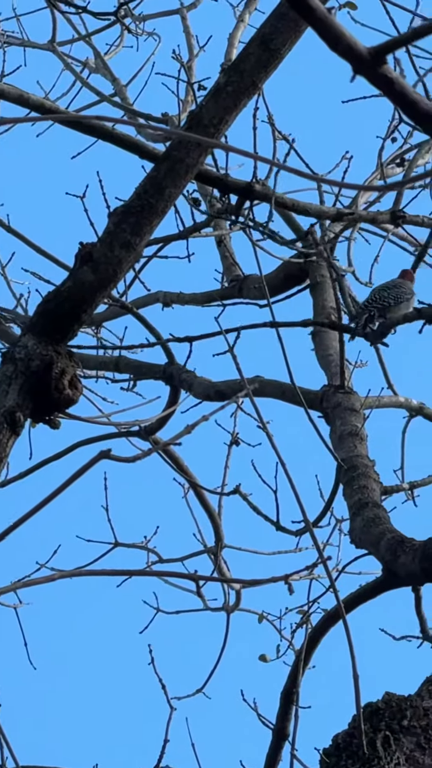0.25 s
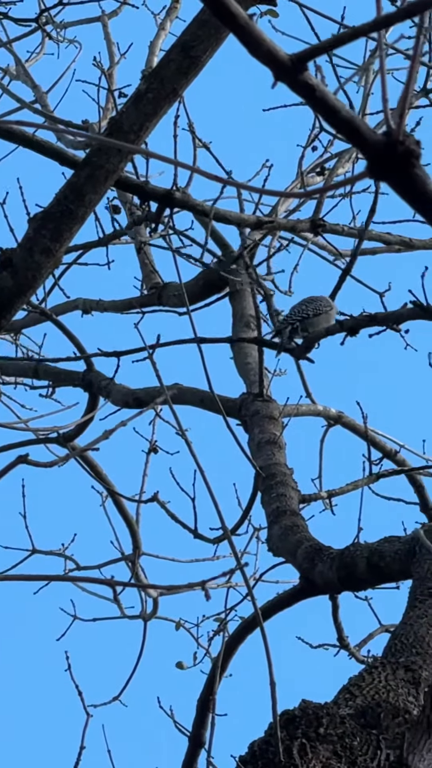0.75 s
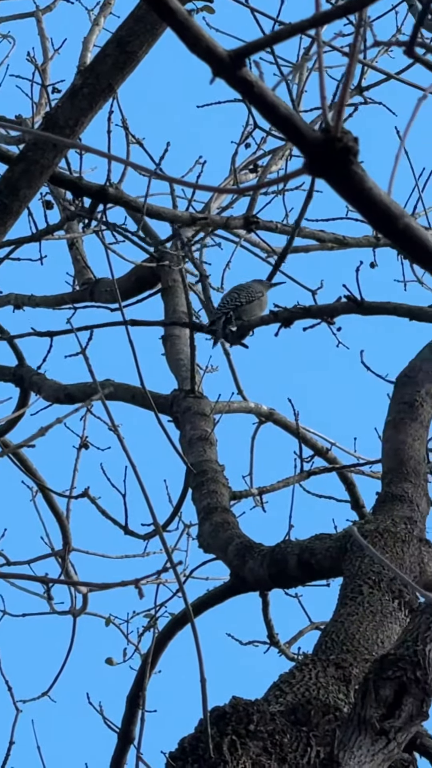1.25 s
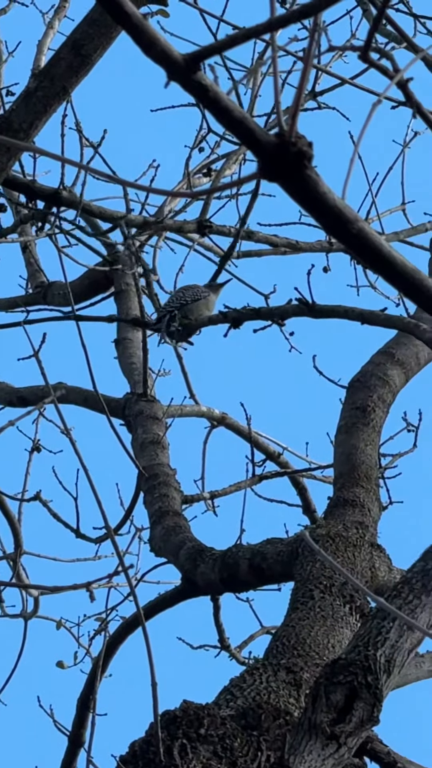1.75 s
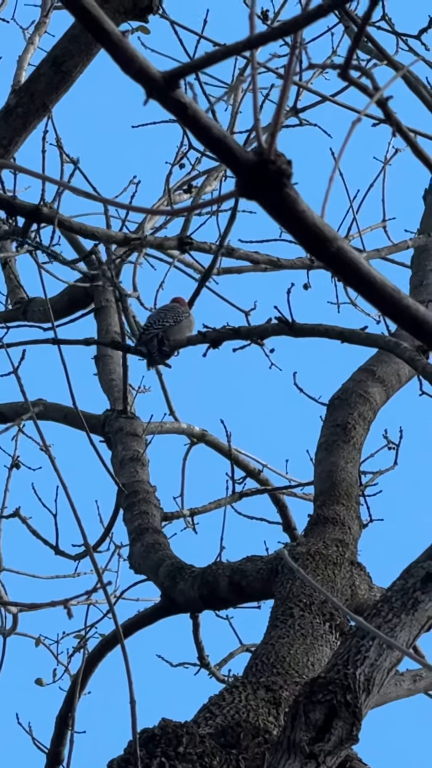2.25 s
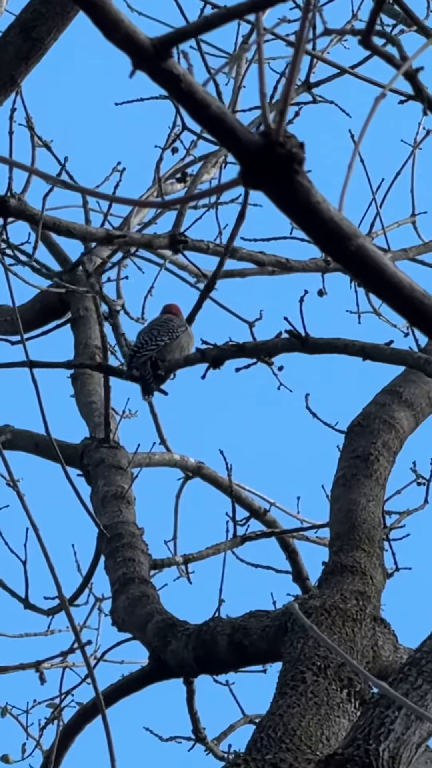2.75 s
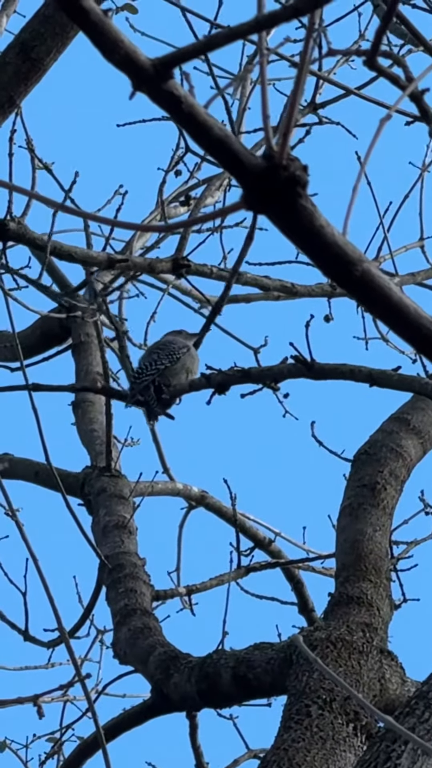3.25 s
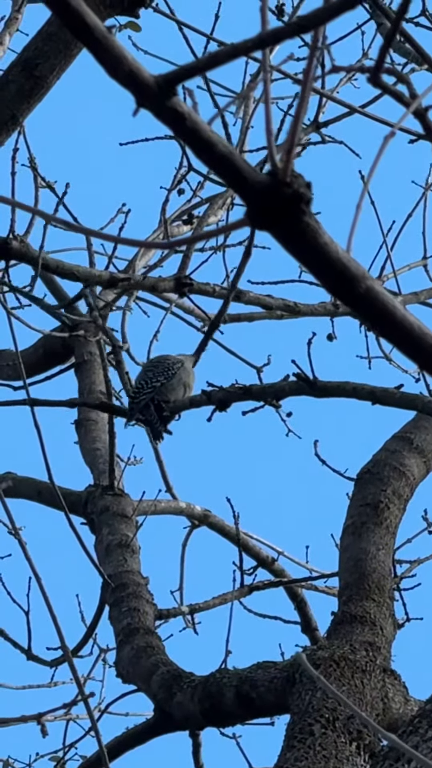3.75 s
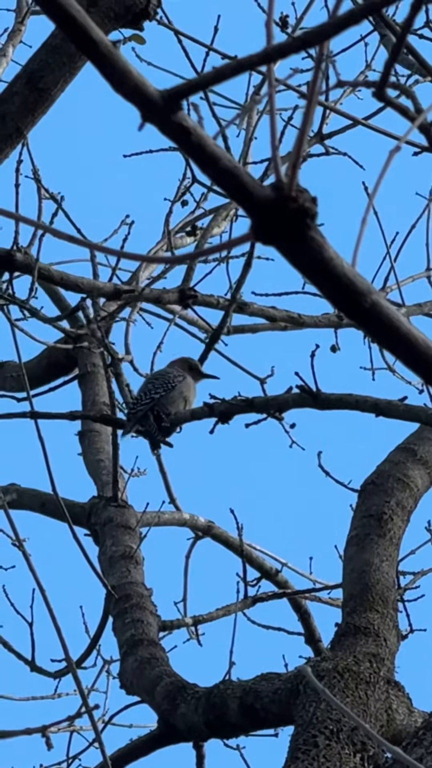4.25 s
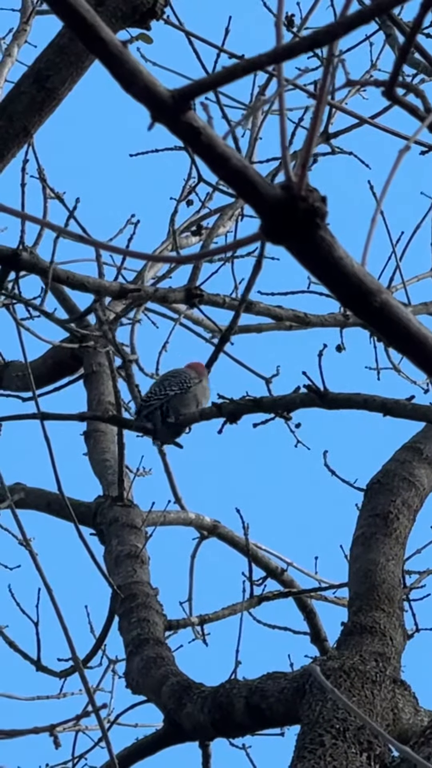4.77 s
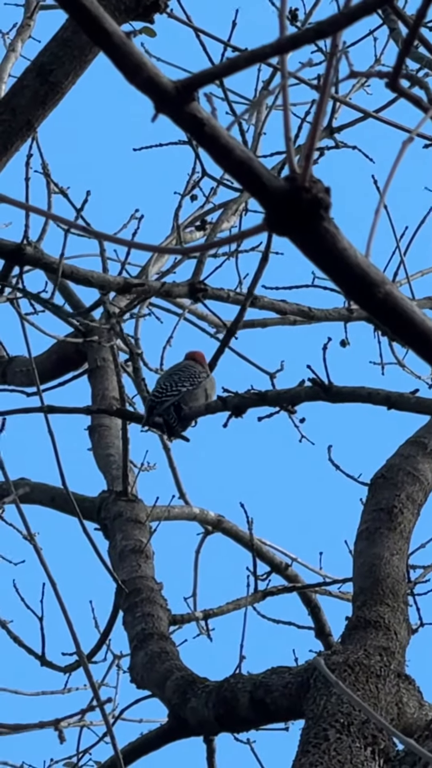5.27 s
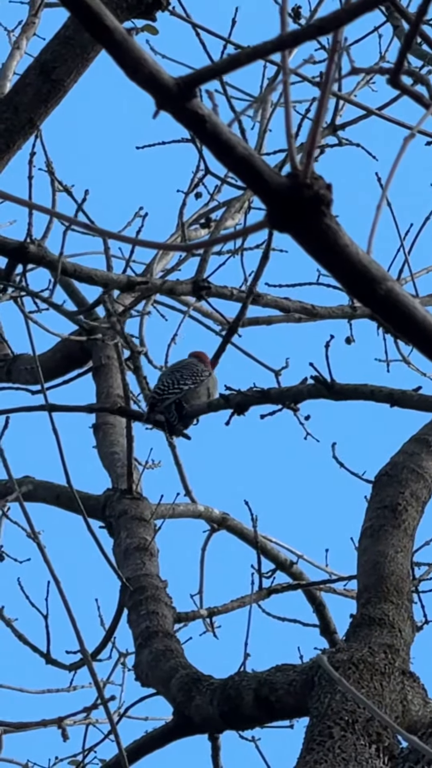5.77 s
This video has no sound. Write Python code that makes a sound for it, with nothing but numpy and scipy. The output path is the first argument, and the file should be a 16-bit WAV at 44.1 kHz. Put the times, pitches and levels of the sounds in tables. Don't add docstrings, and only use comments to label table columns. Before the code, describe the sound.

A woodpecker in bare trees gives short harsh rattling calls with dropping whistles, over lumpy low wind thuds and a faint distant hum.

```python
import sys
import numpy as np
from scipy import signal
from scipy.fft import rfft, irfft, next_fast_len
from scipy.io import wavfile
from scipy.ndimage import uniform_filter1d, map_coordinates

SR = 44100
rng = np.random.default_rng(int(sys.argv[2]) if len(sys.argv) > 2 else 0)


def file_out(sig):
    cols = np.atleast_2d(sig).T
    lim = np.clip(cols, -1, 1)
    pcm = np.round(lim * 32767).astype(np.int16)
    wavfile.write(sys.argv[1], SR, pcm)


def gain_from_db(level_db):
    decades = np.asarray(level_db, float) / 20
    return 10 ** decades


N = 265085

# (peak time [s], peak level [dB], top pitch [Hz], hold [s], pitch crest after the peak [s])
RATTLES = [(.491, -45.5, 583.6, 0.00084, -0.002), (1.917, -39, 639, 0.011, 0.0022),
           (2.212, -44.5, 578.5, .004, .001), (4.479, -41, 655.3, .002, -0.0036),
           (4.775, -46, 622, .009, .004), (5.096, -47.5, 581, 0.0019, .003)]
# (peak time [s], peak level [dB], pitch at the peak [Hz], opening pitch [Hz], drop [s])
WHISTLES = [(.503, -45.5, 1553, 1630, .011), (1.937, -42, 1450, 1600, 0.0077),
            (2.23, -43.5, 1540, 1720, .006), (4.503, -35.5, 1571, 1950, 0.0122),
            (4.788, -53.5, 1600, 1650, 0.0059), (5.103, -51.5, 1500, 1630, .011)]
# (swell [dB per ms], held before the peak [s], tail pitch [Hz], tail level [dB], end time [s])
TAILS = [(3.5, 0.0041, 1190, -53.5, 0.577), (4.5, 0.0028, 1250, -54.5, 2.01),
         (3.5, 0.0026, 1185, -51, 2.33), (1.2, 0.01, 1260, -51.5, 4.582), (1.5, .02, 1180, -51.5, 4.878),
         (3, .003, 1150, -58, 5.235)]
# (breath level [dB], puff over it [dB], puff after the whistle's peak [s])
BREATHS = [(-57.5, 14.5, .004), (-55, 2, -0.034), (-59.5, 11, -.006), (-55, 9.5, 0.013), (-57, 9, -.006),
           (-59, 3, 0.001)]
HISS_HZ = [4470, 5000, 4420, 5360, 4870, 4360]
# (throat frequency [Hz], throat level [dB], gape frequency [Hz], gape level [dB], sheen level [dB])
BEAK = [(2860, -0.5, 4075, 13, 3.5), (3720, 5.5, 5040, 8.5, 11.5), (3160, 5.5, 4520, 15, -10),
        (2950, -1, 5200, 17, 5), (3200, 6.5, 4060, 14, 6), (2630, 4, 4100, 8.5, -19)]
LEAD_IN_S, CALL_S = .025, .195
BEAMED = .3


def woodpecker():
    out = np.zeros((2, N))
    for *rows, hiss_hz, beak in zip(RATTLES, WHISTLES, TAILS, BREATHS, HISS_HZ, BEAK):
        t = rows[0][0] - LEAD_IN_S + np.arange(round(CALL_S * SR)) / SR
        rattle_hz, rattle_db, whistle_hz, whistle_db, breath_db = phrase(t, *rows)
        slack = np.clip((1550 - whistle_hz) / 350, 0, 1)
        turn = 2 * np.pi * np.cumsum(rattle_hz * (1 + .003 * wobble(300, size=len(t)))) / SR
        rattle = rattling_membrane(rattle_hz, turn, beak)
        whistle = whistling_membrane(whistle_hz, slack)
        breath = puffed_breath(turn, hiss_hz, beak)

        call = gain_from_db(rattle_db - 1.5) * rattle
        call += gain_from_db(whistle_db + 5) * whistle
        call += gain_from_db(breath_db + 1.0) * breath
        missed = BEAMED * (1 - slack) * gain_from_db(whistle_db + 5.5) * whistle
        add(out, t[0], call[None])
        add(out, t[0] + 0.0037, gain_from_db(-8.5) * trees(call - missed))
    return out


# (time [s], share of top pitch [0-1])
ARCH = [(-.025, .84), (-.011, .925), (0, 0.99), (.01, .945), (.02, .88)]
SWELL_DB_MS2, CHOKE_DB_MS2, MUTE_DB = .075, .14, 45
ATTACK_S, ATTACK_DB_MS, RELEASE_DB_MS = 0.013, 1.9, 2
GLIDE_S = .026
SNAP_DB_MS, SAG_DB_S, FALTER_DB = 0.9, 110, 2.5
SAG_HZ_S, SAG_S, WANDER = 2300, .06, .03
PUFF_S, BREATH_SAG_DB_S = 0.011, 45.5


def phrase(t, rattle, whistle, tail, breath):
    head_s, head_db, top_hz, hold_s, crest_s = rattle
    peak_s, peak_db, peak_hz, high_hz, drop_s = whistle
    swell_db_ms, held_s, tail_hz, tail_db, end_s = tail
    breath_db, puff_db, puff_s = breath
    ms = lambda seconds: 1000 * np.maximum(seconds, 0)
    release_db = RELEASE_DB_MS * ms(t - end_s)
    edges_db = ATTACK_DB_MS * ms(t[0] + ATTACK_S - t) + release_db

    rattle_hz = top_hz * np.interp(t - head_s - crest_s, *np.transpose(ARCH))
    loss_db = SWELL_DB_MS2 * ms(head_s - t) ** 2 + CHOKE_DB_MS2 * ms(t - head_s - hold_s) ** 2
    rattle_db = head_db - np.minimum(loss_db, MUTE_DB) - release_db

    held = np.exp(-(np.maximum(t - peak_s, 0) / drop_s) ** 1.5)
    sunk_hz = tail_hz - SAG_HZ_S * np.clip(t - peak_s, 0, SAG_S)
    sunk_hz = sunk_hz * (1 + WANDER * wobble(45, size=len(t)))
    glide_hz = (high_hz - peak_hz) * np.clip((peak_s - t) / GLIDE_S, 0, 1) ** 2
    whistle_hz = held * peak_hz + (1 - held) * sunk_hz + glide_hz

    tired_db = tail_db - SAG_DB_S * (t - peak_s) + FALTER_DB * wobble(50, size=len(t))
    after_db = np.maximum(peak_db - SNAP_DB_MS * ms(t - peak_s), np.minimum(peak_db, tired_db))
    whistle_db = after_db - swell_db_ms * ms(peak_s - held_s - t) - 2 * edges_db

    puff = puff_db * np.exp(-((t - peak_s - puff_s) / PUFF_S) ** 2)
    breath_db = breath_db - BREATH_SAG_DB_S * (t - head_s) + puff - edges_db
    return rattle_hz, rattle_db, whistle_hz, whistle_db, breath_db + FALTER_DB * wobble(50, size=len(t))


def rattling_membrane(rattle_hz, turn, beak):
    k = np.arange(1, 27)[:, None]
    smear = np.array([wobble(350, size=len(turn)) for _ in k])
    blur = smear * np.minimum(k / 11, 1.3) ** 3
    opening = rattle_hz / rattle_hz.max()
    spread = .12 * k ** 2
    return np.sum(throat(k * rattle_hz, opening, beak) * np.cos(k * turn + blur + spread), axis=0)


OVERTONES = [-13, 0, -12, -30, -19, -32]


def whistling_membrane(whistle_hz, slack):
    size = len(whistle_hz)
    shake = (.005 + .032 * slack) * wobble(220, size=size)
    swing = 2 * np.pi * np.cumsum(whistle_hz * (1 + shake)) / SR
    whistle = np.zeros(size)
    for n, db in enumerate(OVERTONES, 1):
        slack_db = slack * (5.6 * (n == 1) - 16 * (n > 2))
        dip_db = 10 * bump(n * whistle_hz, 860, 350)
        whistle += gain_from_db(db + slack_db - dip_db) * np.sin(n * swing)
    whistle *= gain_from_db((1.2 + 2 * slack) * wobble(120, size=size))
    glide = uniform_filter1d(np.abs(np.gradient(np.log(whistle_hz))) * SR, size=SR // 300)
    whistle *= gain_from_db(-np.minimum(.018 * glide ** 2, 18))
    flap = 2 * np.pi * np.cumsum(310 * (1 + 0.074 * wobble(90, size=size))) / SR
    return whistle * gain_from_db(6 * slack * np.cos(flap))


# (frequency [Hz], level [dB])
BREATH = [(900, -2.5), (1300, 6.5), (2300, 6), (3200, -0.5), (5000, 3), (12000, 4.5)]


def puffed_breath(turn, hiss_hz, beak):
    puffs = rng.standard_normal(len(turn)) * (1 + 0.81 * np.cos(turn))
    hiss_db = lambda hz: along(BREATH, hz) + 6.4 * bump(hz, hiss_hz, 500)
    return unit(filtered(puffs, lambda hz: throat(hz, 0, beak) * gain_from_db(hiss_db(hz))))


# (frequency [Hz], level [dB])
THROAT = [(600, -29.5), (1200, -9), (1850, -6.5), (2500, -7), (3150, 0.5), (3800, -11), (4400, -15.5),
          (5600, -15.5), (7500, -10.5), (8800, -24.5), (10500, -21.5), (12600, -30), (15000, -30)]


def throat(hz, gape, beak):
    throat_hz, throat_db, gape_hz, gape_db, sheen_db = beak
    db = along(THROAT, hz) + throat_db * bump(hz, throat_hz, 800)
    db = db + gape_db * bump(hz, gape * gape_hz, 500)
    return gain_from_db(db + sheen_db * bump(hz, 12000, 3800))


# (time [s], from [Hz], to [Hz], length [s], level [dB])
NEAR_CHIPS = [
    (2.229, 5740, 8190, .025, -48.5),
    (2.933, 8130, 7130, 0.021, -69.5),
]
# (time [s], from [Hz], to [Hz], length [s], level [dB])
FAR_CHIPS = [
    (.662, 6400, 6930, .04, -91),
    (.71, 7400, 8370, .037, -89.5),
    (.739, 8300, 7180, .084, -88),
    (1.357, 5740, 7870, .038, -73),
    (4.19, 3875, 3490, .25, -98.5),
    (5.004, 5712, 7670, .03, -66),
]
# (time [s], from [Hz], to [Hz], length [s], level [dB])
THIN_CHIPS = [(1.36, 12500, 15300, .035, -95), (5.005, 12300, 15000, .028, -69)]
NEAR_ECHO_DB, FAR_ECHO_DB = -9.5, 12.5


def songbirds():
    out = np.zeros((2, N))
    chips = [(*chip, NEAR_ECHO_DB) for chip in NEAR_CHIPS]
    chips += [(*chip, FAR_ECHO_DB) for chip in FAR_CHIPS + THIN_CHIPS]
    for s, from_hz, to_hz, length, direct_db, echo_db in chips:
        u = np.minimum(np.arange(SR // 3) / (length * SR), 1)
        hz = to_hz + (from_hz - to_hz) * (1 - u) ** 1.6
        note = np.sin(np.pi * u ** 0.98) * np.sin(2 * np.pi * np.cumsum(hz) / SR)
        add(out, s, gain_from_db(direct_db + 3.5) * note[None])
        add(out, s, gain_from_db(direct_db + echo_db + 2.5) * trees(note))
    return out


# (time [s], peak level [dB], time to fall 60 dB [s], rustle under the peak [dB])
TICKS = [(0.8636, -67.5, 0.0018, -13), (0.9223, -65, 0.00138, -16.5), (0.9827, -73.5, 0.0048, -6),
         (1.11, -78, 0.0036, -10.5), (1.172, -77.5, 0.0036, -15), (1.1798, -65, 0.0041, -13.5),
         (1.6204, -72.5, 0.0031, -7.5), (2.5264, -89.5, 0.0039, -10), (3.1065, -72, 0.0062, -13),
         (3.351, -78, 0.004, -10), (3.975, -71.5, 0.0035, -10), (3.989, -75, 0.0043, -6.5),
         (4.011, -73.5, 0.004, -7.5), (4.2194, -82, 0.0047, -10)]
# (frequency [Hz], level [dB])
TWIG = [(1000, -17), (4000, 0.5), (7000, 1.5), (10500, 11.5), (15000, -3.5)]


def twigs():
    out, t = np.zeros((1, N)), np.arange(SR // 10) / SR
    for s, db, t60, rustle_db in TICKS:
        spit = gain_from_db(db + 1 - 60 * t / max(t60, .001))
        rustle = gain_from_db(db + rustle_db - 60 * t / 0.11)
        add(out, s, (spit + rustle) * rng.standard_normal((1, len(t))))
    return filtered(out, lambda hz: gain_from_db(along(TWIG, hz)))


# (frequency [Hz], time to fall 60 dB [s])
TREES = [(1000, 1), (3000, 0.86), (6000, 0.63), (9000, 0.69), (15000, 0.38)]
# (delay [s], level [dB])
ECHOES = [(.018, -20), (.033, -20), (.056, -17), (.071, -20), (.11, -22)]


def trees(x):
    hz, t, z = signal.stft(rng.standard_normal((2, SR)), SR, nperseg=256)
    near_db = 6 / (1 + (t / 0.14) ** 4)
    fall_db = 60 * t / along(TREES, hz)[:, None]
    mid, side = signal.istft(z * gain_from_db(near_db - fall_db), SR, nperseg=256)[1]
    tail = np.array([mid + 0.13 * side, mid - 0.41 * side]) / np.linalg.norm(mid)
    for s, db in ECHOES:
        tail[:, round(s * SR)] += gain_from_db(db + rng.normal(0, 3.5))
    swaying = .64 + .78 * wobble(700, size=len(x))
    return signal.fftconvolve((x * swaying)[None], tail, axes=1)


def background():
    t = np.arange(N) / SR
    push, duck = cross_gusts(t)
    return wind_thuds(t) + push + town_hum(duck) + air_hiss()


# (time [s], peak level [dB], half length [s])
LUMPS = [(.01, -41.5, 0.053), (0.223, -49, 0.041), (0.347, -41, 0.033), (0.811, -40.5, 0.033),
         (0.905, -41.5, 0.026), (1.13, -46, 0.11), (1.339, -49, 0.041), (1.47, -36.5, 0.033),
         (1.62, -49.5, 0.22), (1.84, -45, 0.033), (1.958, -44.5, 0.034), (2.098, -43.5, 0.035),
         (2.399, -51, 0.36), (2.935, -49, .04), (3.104, -38, 0.067), (3.2, -40.5, 0.048),
         (3.329, -43, 0.053), (3.577, -37, 0.094), (3.804, -44, 0.042), (3.913, -43.5, 0.048),
         (4.105, -42, 0.083), (4.397, -44, 0.15), (4.64, -45, 0.043), (4.94, -47.5, 0.11),
         (5.102, -46, 0.025), (5.368, -47.5, 0.16), (5.48, -40.5, 0.066), (5.625, -44, 0.035),
         (5.723, -44, 0.062), (5.92, -39.5, 0.11)]
# (frequency [Hz], level [dB per Hz])
THUD = [(12, -41.5), (20, -15), (38, -2), (65, 5.5), (92, 0.5), (242, -30.5), (274, -32), (300, -31.5),
        (390, -67.5), (660, -120)]
# (frequency [Hz], likeness [0-1])
CENTRED = [(60, 1)]
BREEZE_DB = -52.5


def wind_thuds(t):
    thud_db = lumps(t, BREEZE_DB, *np.transpose(LUMPS))
    return gain_from_db(thud_db) * unit(gain_from_db(1.5 * wobble(14)) * rush(THUD, CENTRED, patchy_db=.5))


# (time [s], low level [dB], flutter level [dB], half length [s])
GUSTS = [(.12, -81, -95, .05), (.38, -74.5, -95, 0.085), (1.3, -73, -95, .08), (1.52, -70, -90, .06),
         (2.2, -71, -58, 0.022), (2.535, -63, -56, 0.018), (2.55, -70, -74, 0.22), (2.77, -67, -67, .025),
         (3.33, -61, -79, 0.14), (3.53, -66, -84, .1), (3.78, -72, -85, .1), (4.28, -65.5, -89, .2),
         (4.72, -56, -71, 0.2), (5.04, -51.5, -66, 0.13), (5.4, -49, -58.5, 0.18), (5.72, -51, -60, 0.58)]
# (frequency [Hz], level [dB per Hz])
GUST_LOW = [(15, -32), (35, -4), (60, 2), (120, 1), (170, -15), (300, -74.5)]
# (frequency [Hz], level [dB per Hz])
GUST_HIGH = [(80, -30), (170, 0), (400, -6), (800, -13), (1300, -30), (2000, -70)]
STILL_LOW_DB, STILL_FLUTTER_DB = -99, -88.5


def cross_gusts(t):
    s, low, flutter, half = np.transpose(GUSTS)
    low_db = lumps(t, STILL_LOW_DB, s, low, half)
    flutter_db = lumps(t, STILL_FLUTTER_DB, s, flutter, half)
    noise = gain_from_db(3 * wobble(16)) * rng.standard_normal((2, N))
    low, flutter = filtered(noise, lambda hz: gain_from_db([along(GUST_LOW, hz), along(GUST_HIGH, hz)]))
    push = gain_from_db(low_db) * unit(low) + gain_from_db(flutter_db) * unit(flutter)
    duck = np.clip((uniform_filter1d(flutter_db, size=SR // 6) + 64) / 8, 0, .72)
    return np.array([push, -push]), duck


def lumps(t, still_db, times, peaks_db, halves):
    power = gain_from_db(2 * still_db)
    for s, db, half in zip(times, peaks_db, halves):
        power = power + gain_from_db(2 * (db - np.minimum(12 * ((t - s) / half) ** 2, 90)))
    return 10 * np.log10(power)


# (frequency [Hz], level [dB per Hz])
HUM = [(71, -36.5), (120, -6.5), (135, -7.5), (243, -13.5), (268, -16), (452, -20.5), (703, -22.5),
       (775, -21.5), (1730, -41.5), (2070, -45), (6000, -61), (7800, -89), (13200, -120)]
# (frequency [Hz], lead [radians])
HUM_LEAD = [(300, 0.22), (860, 1.6), (1250, 0), (1800, 0)]
# (frequency [Hz], likeness [0-1])
ALIKE = [(130, 1), (240, 0.97), (400, 0.89), (650, 0.64), (1000, 0.63), (1400, 0.31), (1800, .995),
         (5200, .99), (7000, 0.32), (14000, 0.76)]
HUM_DB = -69.5


def town_hum(duck):
    level = gain_from_db(HUM_DB + 12 + 0.31 * wobble(6.3))
    hum = level * filtered(rush(HUM, ALIKE, patchy_db=1.24), lead(HUM_LEAD))
    return hum - duck * filtered(hum, lambda hz: bump(hz, 307, 430))


# (frequency [Hz], level [dB per Hz])
AIR = [(3000, -54.5), (5000, -10.5), (5500, -3), (8300, -4.5), (11000, -12.5), (13000, -8.5), (14300, -7),
       (15000, -20), (15700, -24.5)]
AIR_DB = -102


def air_hiss():
    return gain_from_db(AIR_DB + 11.5) * rush(AIR, ALIKE, patchy_db=.8)


def rush(spectrum, alike, patchy_db):
    z = signal.stft(rng.standard_normal((2, N)), nperseg=512)[2]
    field = uniform_filter1d(rng.standard_normal(z.shape[1:]), size=5, axis=0)
    field = uniform_filter1d(field, size=12, axis=1)
    pair = signal.istft(z * gain_from_db(patchy_db * unit(field)), nperseg=512)[1][:, :N]
    angle = lambda hz: np.arccos(np.clip(along(alike, hz), -1, 1)) / 2
    shares = lambda hz: np.array([np.cos(angle(hz)), np.sin(angle(hz))])
    mid, side = filtered(pair, lambda hz: gain_from_db(along(spectrum, hz)) * shares(hz))
    return unit(np.array([mid + side, mid - side]))


def unit(x):
    return x / np.sqrt(np.mean(x ** 2) + 1e-20)


def along(points, hz):
    f, v = np.transpose(points)
    return np.interp(np.log(hz + 1), np.log(f + 1), v)


def bump(hz, centre_hz, width_hz):
    return 1 / (1 + (2 * (hz - centre_hz) / width_hz) ** 2)


def wobble(rate, size=N):
    knots = rng.standard_normal(int(size * rate / SR) + 4)
    return map_coordinates(knots, [np.arange(size) * rate / SR])


def filtered(x, response):
    m = next_fast_len(x.shape[-1] + 8192)
    return irfft(rfft(x, m) * response(np.fft.rfftfreq(m, 1 / SR)), m)[..., :x.shape[-1]]


def lead(points):
    return lambda hz: np.exp(.5j * np.outer([1, -1], along(points, hz)))


def add(out, s, sound):
    part = out[:, round(s * SR):][:, :sound.shape[-1]]
    part += sound[..., :part.shape[1]]


def scene():
    return background() + twigs() + songbirds() + woodpecker()


def roll_off(x):
    return signal.sosfilt(signal.butter(12, 16390, fs=SR, output="sos"), x)


# (frequency [Hz], lead [radians])
PORT_LEAD = [(2400, 0), (3100, .15), (4500, .15), (5100, 0), (5900, -.7), (7200, -1.3), (8600, -1.9),
             (10200, -2.4), (11200, -3), (12700, -3.2), (14100, -3.7), (15500, -4.6)]
# (frequency [Hz], gain [dB])
WIDTH = [(1300, 0), (1800, -9), (2500, -18), (2900, 0.5), (3400, 1), (4000, -13), (5300, -5), (5900, 0.5)]
TOP_HZ = 15700


def record(dry):
    left, right = filtered(dry, lambda hz: lead(PORT_LEAD)(hz) * (hz < TOP_HZ))
    mid = (left + right) / 2
    side = filtered((left - right) / 2, lambda hz: gain_from_db(along(WIDTH, hz)))
    return roll_off(np.array([mid + side, mid - side]))


dry = scene()
out = record(dry)
file_out(out)
```